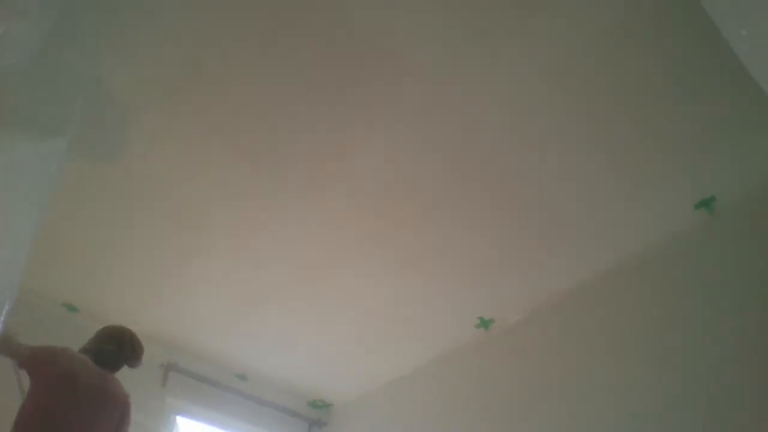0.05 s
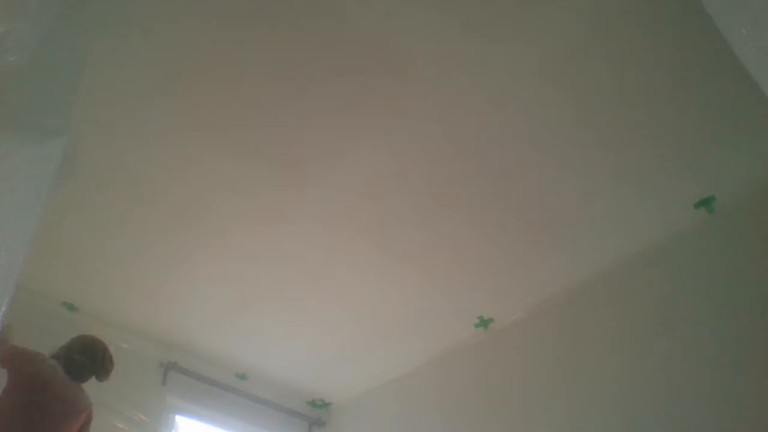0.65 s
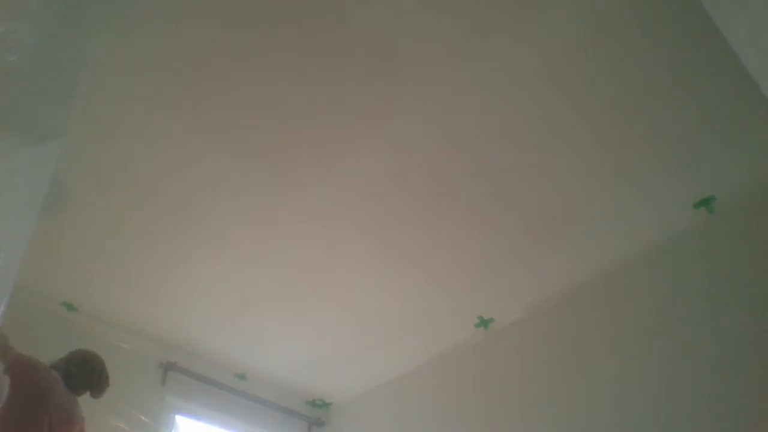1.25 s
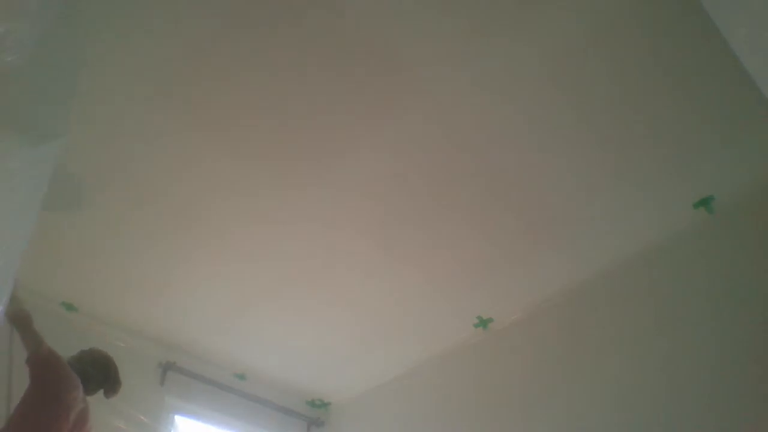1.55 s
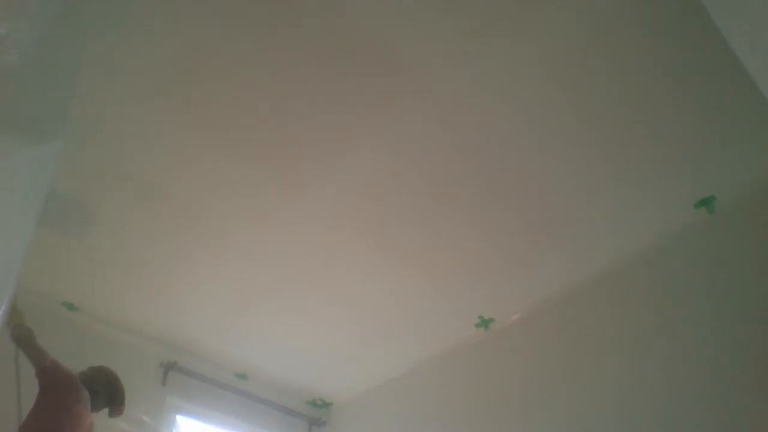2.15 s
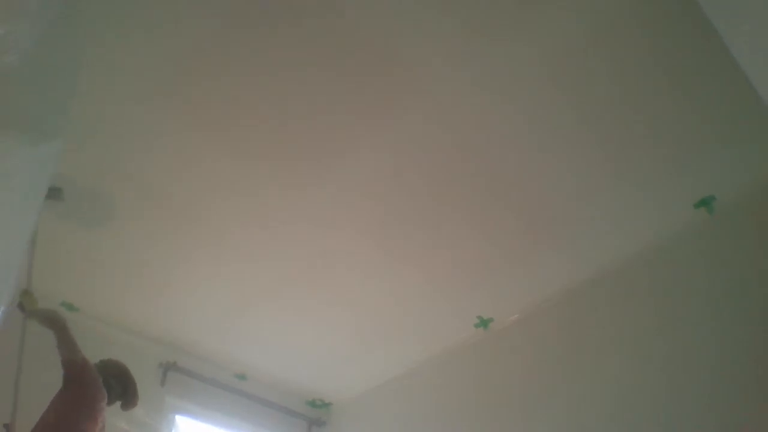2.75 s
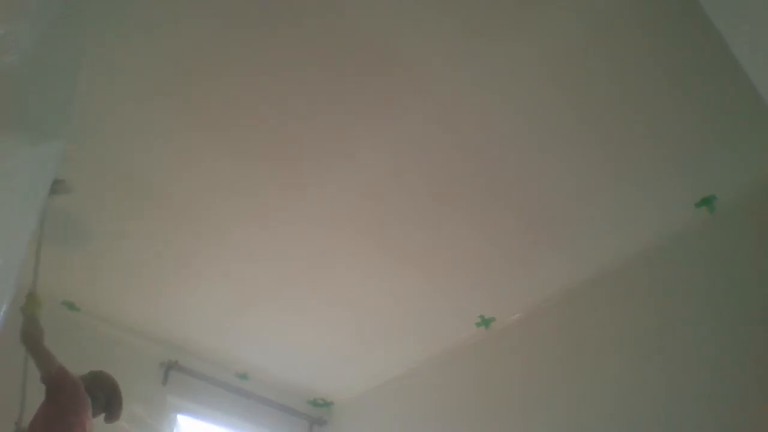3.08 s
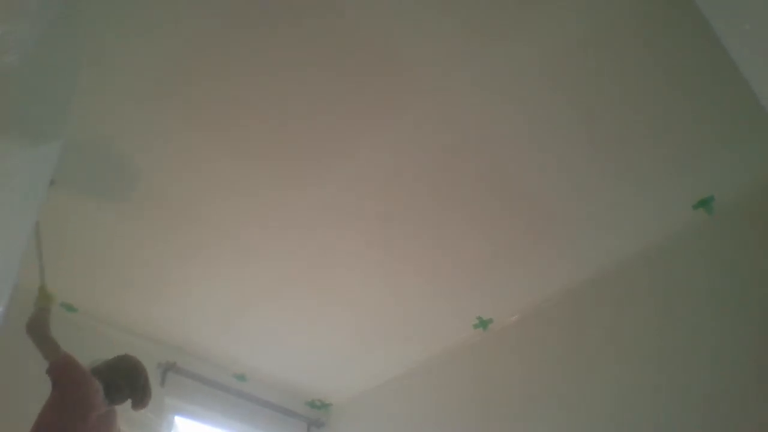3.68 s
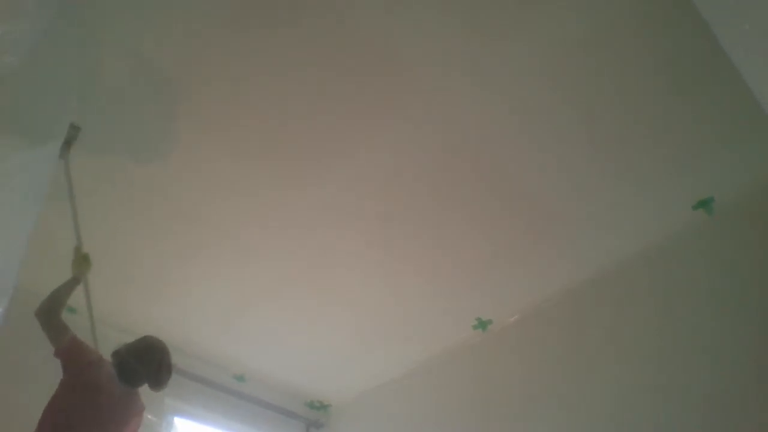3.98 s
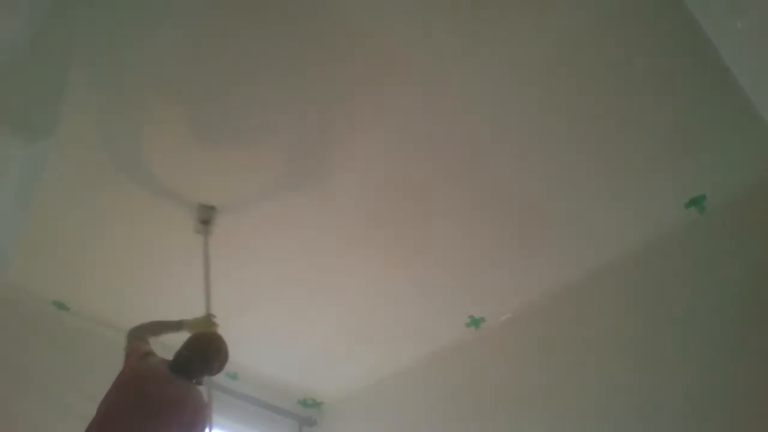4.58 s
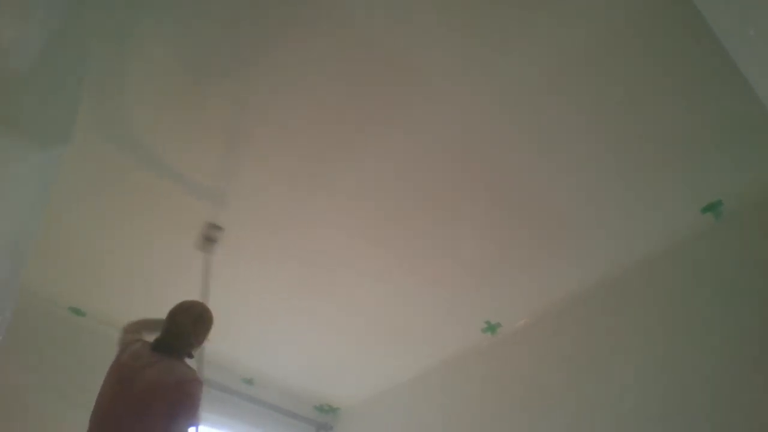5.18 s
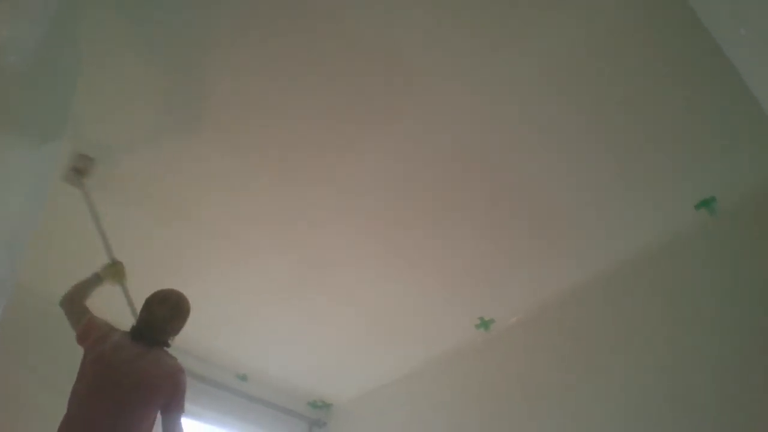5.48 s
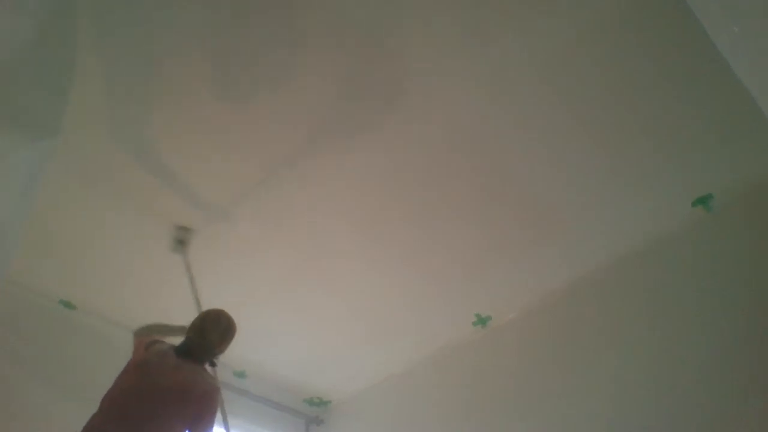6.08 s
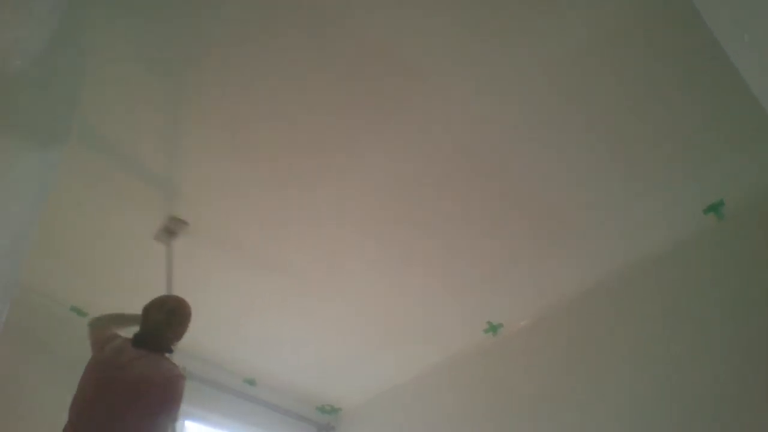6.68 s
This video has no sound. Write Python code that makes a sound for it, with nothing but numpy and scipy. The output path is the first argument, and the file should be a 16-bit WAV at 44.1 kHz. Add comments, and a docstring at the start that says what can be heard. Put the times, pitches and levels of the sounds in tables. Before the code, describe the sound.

A pole sander works on a plasterboard ceiling a few metres away in a bare, slightly echoing room. It opens quietly with a few light brushes of the pad, including a brief swish at about 0.5 seconds. Around 1 second the head bumps the ceiling with a hollow, briefly ringing thump. From about 1.3 seconds long back-and-forth strokes begin, a bright, gritty rasp that swells and eases roughly every half second to one second and continues to the end, near 7 seconds. Beneath it the dragging pad draws a faint drone from the board, with soft, hollow, gliding groans, the clearest around 4 seconds. The swivel joint flips and gives short plastic clacks at about 3.1, 5, 5.8 and 6.5 seconds. A low rumble and faint hiss lie underneath throughout.

```python
"""A bare room, where a pole sander rasps back and forth on a plasterboard ceiling a few metres away.
After a few light brushes the head bumps against the board, then long strokes follow. Grit tearing at
the plaster makes the rasp; the dragging pad shakes the board into a drone and, where it judders, a groan.
At some turns the swivel joint flips over and clacks. A low rumble and a faint hiss lie underneath."""
import sys
import numpy as np
from scipy import signal
from scipy.fft import rfft, irfft, next_fast_len
from scipy.io import wavfile
from scipy.ndimage import map_coordinates

SR = 44100
rng = np.random.default_rng(int(sys.argv[2]) if len(sys.argv) > 2 else 0)


def digitize_waveform(pressure):
    """Quantize a signal to 16-bit integers and store it at the path in sys.argv[1].

    Rows of a 2-D input are taken as channels; values are limited to [-1, 1].
    """
    field = np.atleast_2d(pressure).T
    bounded = np.clip(field, -1, 1)
    quanta = np.round(bounded * 32767).astype(np.int16)
    wavfile.write(sys.argv[1], SR, quanta)


N = 305613


def amp(db):
    """Decibels to gain."""
    return 10 ** (np.asarray(db) / 20)


def unit(x):
    """x at rms 1."""
    return x / np.sqrt(np.mean(x ** 2) + 1e-20)


def along(points, hz):
    """Read (frequency [Hz], value) points on a log-frequency axis."""
    f, v = np.transpose(points)
    return np.interp(np.log(hz + 1), np.log(f + 1), v)


def automation(points):
    """(time [s], value) points joined into one value per sample."""
    times, values = np.transpose(points)
    return np.interp(np.arange(N) / SR, times, values)


def wobble(rate):
    """A smooth random curve, rate knots a second."""
    knots = rng.standard_normal(int(N * rate / SR) + 4)
    return map_coordinates(knots, [np.arange(N) * rate / SR])


def filtered(x, response):
    """x through a complex frequency response."""
    n = x.shape[-1]
    padded = next_fast_len(n + 8192)
    return irfft(rfft(x, padded) * response(np.fft.rfftfreq(padded, 1 / SR)), padded)[..., :n]


def coloured(x, spectrum):
    """x through an EQ curve of (frequency [Hz], level [dB]) points, at rms 1."""
    return unit(filtered(x, lambda hz: amp(along(spectrum, hz))))


def hump(hz, centre_hz, octaves):
    """A bell on the log-frequency axis, 1 at its centre."""
    return np.exp(-.5 * (np.log2((hz + 1) / centre_hz) / octaves) ** 2)


def add(track, s, sound):
    """Mix a sound in at time s."""
    part = track[..., round(s * SR):][..., :sound.shape[-1]]
    part += sound[..., :part.shape[-1]]


def grains(per_second, spread_db):
    """Tiny random fractures of log-normal size, at rms 1."""
    chance = np.clip(per_second / SR, 1e-4, 1) * np.ones(N)
    hits = (rng.random(N) < chance) / np.sqrt(chance)
    polarity = np.sign(rng.standard_normal(N))
    sizes = amp(spread_db * np.clip(rng.standard_normal(N), -2, 2))
    return unit(hits * polarity * sizes)


def swell(start, length, rise, fall):
    """A movement from rest to full speed (1) and back to rest; times in seconds."""
    t = np.arange(N) / SR - start
    return np.clip(t / rise, 0, 1) ** 0.82 * np.clip((length - t) / fall, 0, 1) ** 1.714


def diffuse():
    """Stereo noise arriving from all sides: alike left and right in the lows only."""
    # width of the diffuse field: (frequency [Hz], left-right correlation)
    likeness = [(50, 0.25), (300, 0.89), (550, 0.87), (850, 0.17), (2000, 0)]

    def mid_side_gains(hz):
        angle = np.arccos(np.clip(along(likeness, hz), -1, 1)) / 2
        return np.array([np.cos(angle), np.sin(angle)])

    mid, side = filtered(rng.standard_normal((2, N)), mid_side_gains)
    return np.array([mid + side, mid - side])


def direct(x):
    """The straight path, later on the left; long waves bend round and reach both sides together."""
    lag_s = np.array([[.00039], [0]])
    return filtered(x, lambda hz: np.exp(-2j * np.pi * hz * lag_s * (1 - np.exp(-(hz / 700) ** 2))))


def in_room(x, wet_db, size):
    """The sander never stays put, so each band's energy lingers in the room as ever new diffuse noise."""
    # reverb time of the bare room: (frequency [Hz], t60 [s])
    reverb_times = [(100, 0.64), (500, 0.83), (2000, 0.4), (7000, 0.17), (15000, 0.25)]
    hz, t, bands = signal.stft(x, SR, nperseg=size)
    t = t[t < .6]
    decay = amp(-60 * t / along(reverb_times, hz)[:, None]) ** 2 * (t > 0)
    decay /= decay.sum(1, keepdims=True)
    energy = signal.fftconvolve(np.abs(bands) ** 2, decay, axes=1)[:, :bands.shape[1]]
    noise = signal.stft(diffuse(), SR, nperseg=size)[2]
    tail = signal.istft(noise * np.sqrt(np.abs(energy)), SR, nperseg=size)[1][:, :N]
    wet = unit(tail) * x.std()
    return (direct(x) + amp(wet_db) * wet) / np.sqrt(1 + amp(wet_db) ** 2)


def room_tone():
    """A bed of low, uneven rumble under a faint hiss."""
    # colour of the quiet room: (frequency [Hz], level [dB])
    air_eq = [(8, 9), (20, 0), (40, -0.5), (55, -16), (100, -15), (150, -20.5), (210, -16.5), (400, -16),
              (900, -17.5), (1500, -25), (4000, -31), (9000, -33), (16000, -63)]
    return amp(-48.5 + wobble(4.4)) * coloured(diffuse(), air_eq)


def shaken_board(centre_hz, lift_db, octaves):
    """The board shaken by many small slips, with a bell boost round a moving centre, at rms 1."""
    # body of the shaken board: (frequency [Hz], level [dB])
    board_eq = [(60, -1), (110, -11.5), (150, -11), (205, 7.5), (280, -7), (700, 1.5), (1300, -5),
                (1800, 0), (3000, -14.5), (8000, -46)]
    slips = coloured(grains(3000, spread_db=0.5), board_eq)
    hz, t, bands = signal.stft(slips, SR, nperseg=1024)
    sweep_hz = np.interp(t, np.arange(N) / SR, centre_hz)
    lift = amp(lift_db * hump(hz[:, None], sweep_hz, octaves))
    return unit(signal.istft(bands * lift, SR, nperseg=1024)[1][:N])


def drone(level_db, centre_hz):
    """The dragging pad shakes the board, whose strongest range shifts from stroke to stroke."""
    return amp(level_db + 2.5) * shaken_board(centre_hz, lift_db=10, octaves=0.37)


def groans():
    """A juddering pad draws a hollow, gliding groan from the board."""
    # spells of judder: (start [s], length [s], level [dB], from [Hz], to [Hz], spread [octaves])
    judders = [(2.053, .41, -50, 740, 910, .33), (2.49, 0.17, -51, 335, 355, 0.29),
               (3.814, 0.41, -45, 427, 950, 0.88), (4.604, 0.66, -51, 1110, 1350, 0.5),
               (5.595, 0.21, -49.5, 790, 784, 0.77), (6.38, 0.16, -50.5, 900, 900, 0.65)]
    out = np.zeros(N)
    for start, length, db, from_hz, to_hz, octaves in judders:
        centre_hz = automation([(start, from_hz), (start + length, to_hz)])
        envelope = amp(db) * swell(start, length, rise=0.12 * length, fall=0.27 * length)
        out += envelope * shaken_board(centre_hz, lift_db=15.5, octaves=octaves)
    return out


def swish():
    """One brief, light brush of the pad with no bite."""
    # colour of the brush: (frequency [Hz], level [dB])
    brush_eq = [(300, -6), (800, -4), (1400, -1), (2200, 1), (3300, -1.5), (4700, 0.5), (6000, -1.5),
                (9000, -6.5), (14000, -30)]
    start_s, attack_s, hold_s, fade_db_per_s = 0.5326, 0.037, .06, 218
    t = np.arange(N) / SR - start_s
    fade_db = fade_db_per_s * np.maximum(t - attack_s - hold_s, 0)
    envelope = np.clip(t / attack_s, 0, 1) * amp(-36 - fade_db)
    return envelope * coloured(grains(9000, spread_db=3), brush_eq)


def bumps():
    """Each contact of the head snaps, cracks dully and sets the board's modes ringing."""
    # the head hits the board: (time [s], level [dB], crack trim [dB], snap trim [dB])
    contacts = [(0.243, -48, 16, -12), (.952, -32.5, 5.5, 5), (0.964, -27.5, -3, -2.5),
                (.986, -17.5, -3.5, -6), (.997, -21, -0.5, -3.5), (1.012, -23, -4, -18),
                (1.052, -22.5, -13, -15), (4.325, -39, 4, -15), (5.815, -40, 4.5, -15)]
    # modes of the ceiling: (frequency [Hz], level [dB], t60 [s])
    modes = [(99.2, -4, 0.41), (119.4, 0.5, 0.18), (191.5, -4.5, 0.16), (216, -11.5, 0.42),
             (289, -12, 0.16), (348, -18, 0.5), (432, -13, 0.099), (475, -15.5, 0.19), (531, -17, 0.12),
             (708, -14.5, 0.26), (850, -19, 0.28), (960, -7.5, 0.34), (1300, -25, .2)]
    # colour of the dull crack: (frequency [Hz], level [dB])
    crack_eq = [(60, -19), (150, 4), (600, -1.5), (1000, -4), (1600, -17), (4000, -12), (8000, -21),
                (15000, -56)]
    # colour of the hard snap: (frequency [Hz], level [dB])
    snap_eq = [(500, -5), (1300, -3), (2500, 4), (4000, -5), (6000, -8), (9000, -12), (15000, -47)]
    rings, cracks, snaps = np.zeros((3, N))
    t = np.arange(SR // 2) / SR

    def burst(eq, decay_s):
        return coloured(rng.standard_normal(len(t)), eq) * np.exp(-t / decay_s)

    for start, db, crack_db, snap_db in contacts:
        ring = sum(amp(mode_db + rng.normal(0, 1) - 60 * t / t60) * np.sin(2 * np.pi * hz * t)
                   for hz, mode_db, t60 in modes)
        add(rings, start, amp(db - 6.5) * ring)
        add(cracks, start, amp(db + crack_db - 1.5) * burst(crack_eq, decay_s=0.0076))
        add(snaps, start, amp(db + snap_db) * burst(snap_eq, decay_s=.002))
    thump = direct(rings) + in_room(cracks, wet_db=7.5, size=256) + in_room(snaps, wet_db=1.5, size=128)
    # the thumps carry little below about 88 Hz
    return signal.sosfilt(signal.butter(6, 88, "high", fs=SR, output="sos"), thump)


def clacks():
    """The swivel strikes its stop and rattles the plastic head."""
    # hits on the stop: (time [s], level [dB], centre [Hz], spread [octaves])
    hits = [(3.08, -23.5, 1400, 1.8), (5.033, -24.5, 2500, 0.44), (5.038, -22, 2100, 1.1),
            (5.047, -21.5, 1350, 1), (5.801, -25, 2330, 0.27), (5.823, -25, 1300, 1),
            (6.517, -20, 2200, 1.5), (6.528, -19.5, 2300, 2.5), (6.541, -27, 2000, 1.6)]
    # resonances of the sanding head: (frequency [Hz], width [Hz], level [dB])
    resonances = [(700, 430, 1), (1280, 280, 1), (1710, 300, 1.5), (2330, 480, 1.5), (3170, 880, 0.5)]

    def head(hz):
        return sum((-1) ** k * amp(db) * 1j * hz * width / (peak ** 2 - hz ** 2 + 1j * hz * width)
                   for k, (peak, width, db) in enumerate(resonances))

    out = np.zeros(N)
    t = np.arange(SR // 8) / SR
    envelope = np.exp(-t / .0025) + .22 * np.exp(-t / .02)  # sharp transient, short rattle
    for start, db, centre_hz, octaves in hits:
        blow = envelope * rng.standard_normal(len(t))
        knock = filtered(blow, lambda hz: head(hz) * hump(hz, centre_hz, octaves))
        add(out, start, amp(db - 19.5) * unit(knock))
    return in_room(out, wet_db=4.5, size=256)


def strokes():
    """The pad's speed rides the rasp, bite and drone levels and crossfades the drone's centre."""
    # passes of the pad: (start [s], length [s], speeding up [s], slowing down [s],
    # rasp [dB], coarse bite [dB], board drone [dB], drone centre [Hz])
    passes = [(-.03, .44, 0.092, 0.22, -48.5, -58, -54.5, 382),
              (0.347, 0.18, 0.022, 0.093, -52, -51.5, -52, 420),
              (0.804, 0.35, 0.091, .05, -62, -71, -67, 500),
              (0.931, .48, 0.14, 0.19, -44, -46.5, -51.5, 550),
              (1.314, 0.76, 0.2, 0.45, -28.5, -39, -51, 845), (1.924, .68, 0.3, 0.27, -29, -39, -51, 840),
              (2.504, 0.6, 0.17, .1, -25.5, -40, -51.5, 1120),
              (3.074, 0.6, 0.089, 0.39, -26, -39.5, -50.5, 1140),
              (3.476, 0.9, 0.15, 0.73, -28, -39, -58.5, 840), (4.119, 1.127, 0.4, 0.45, -30, -38, -54, 750),
              (5.01, .85, 0.33, 0.26, -27, -40, -58, 1000), (5.779, 0.6, .21, 0.22, -27.5, -42.5, -59, 970),
              (6.179, 0.39, 0.11, 0.21, -27.5, -42, -60, 980), (6.476, .8, 0.26, .2, -27, -41, -59.5, 855)]
    speed = np.array([swell(*row[:4]) for row in passes])
    rasp_db, bite_db, drone_db, centre_hz = np.transpose(passes)[4:, :, None]

    def level(db, speed_power):
        return 10 * np.log10(np.sum((amp(db) * speed ** speed_power) ** 2, 0) + 1e-8)

    pressure_db = .5 * wobble(14)  # the hand's pressure wavers
    share = (speed + 1e-9) / np.sum(speed + 1e-9, 0)
    return (level(rasp_db, speed_power=0.96) + pressure_db,
            level(bite_db, speed_power=0.5) + pressure_db,
            level(drone_db, speed_power=0.46),
            np.sum(share * centre_hz, 0))


def sanding(rasp_db, bite_db):
    """Grit tears at the plaster, chattering a little; a faster pad meets more grains, sounds brighter."""
    # rasp of the fine grit: (frequency [Hz], level [dB])
    grit_eq = [(1000, -56), (2000, -28), (4000, -15), (5600, -10), (6200, -3.5), (7000, -1.5),
               (8100, -12.5), (9000, -8), (10000, -19), (12000, -19), (15700, -53)]
    # fizz of the finest grit, heard most at speed: (frequency [Hz], level [dB])
    fizz_eq = [(3000, -54), (6000, -13.5), (7300, 4), (8200, 1.5), (9200, -3.5), (10500, -11), (13000, -15),
               (15700, -17)]
    # bite of the coarse grit: (frequency [Hz], level [dB])
    bite_eq = [(500, -46), (1200, -5.5), (1900, -11), (2300, -4.5), (3200, -2), (4600, 3), (5600, -2.5),
               (7500, -0.5), (12000, -70)]
    effort_db = rasp_db - rasp_db.max()
    drive = amp(effort_db / 2)  # 1 at the loudest moment of the rasp
    chatter = amp(0.47 * wobble(45) + 0.56 * wobble(260))
    fine = amp(rasp_db + 1.0) * coloured(grains(2000 + 4500 * drive, spread_db=-1.5), grit_eq)
    fizz = amp(rasp_db + 0.27 * effort_db) * coloured(grains(1500 + 3000 * drive, spread_db=3.5), fizz_eq)
    coarse = amp(bite_db + 2.5) * coloured(grains(2500 + 4000 * drive, spread_db=2.5), bite_eq)
    return chatter * (fine + fizz + coarse)


def scene():
    """The drifting rasp, the board and the knocks, mixed over the room tone."""
    # where the sanding head is: (time [s], left minus right [dB])
    head_pan = [(0, 0), (1.5, 1), (3.2, 0), (3.8, -0.5), (4.3, 0), (5.1, 0.5), (5.7, -0.5), (6.4, 1.1),
                (6.93, 0.4)]
    pan = amp(automation(head_pan) * np.array([[.5], [-.5]]))
    rasp_db, bite_db, drone_db, centre_hz = strokes()
    rasp = pan * in_room(sanding(rasp_db, bite_db) + swish(), wet_db=4.5, size=256)
    board = in_room(drone(drone_db, centre_hz) + groans(), wet_db=-0.5, size=1024)
    return rasp + board + clacks() + bumps() + room_tone()


def record(dry):
    """Each microphone port has its own colour; nothing passes above the band limit."""
    # balance of the two ports: (frequency [Hz], left minus right [dB])
    port_balance = [(30, -14.5), (120, -6), (400, -4.5), (680, -1), (1050, -9), (2150, -3), (2900, -4.5),
                    (3350, -7.5), (4300, -6.5), (6700, -10), (7900, -4), (9000, 2.5), (11000, -3),
                    (15000, -11)]
    top_hz = 15850
    sides = np.array([[.5], [-.5]])
    return filtered(dry, lambda hz: amp(along(port_balance, hz) * sides) * (hz < top_hz))


dry = scene()
out = record(dry)
digitize_waveform(out)
```